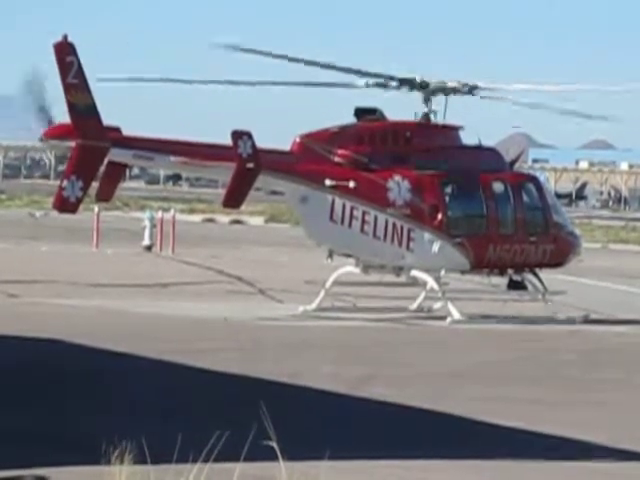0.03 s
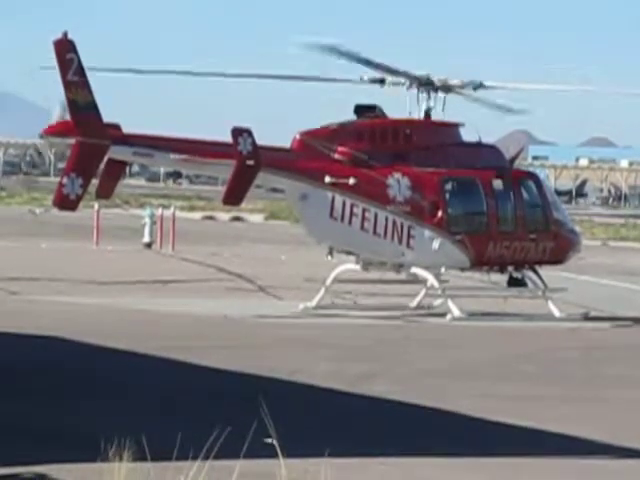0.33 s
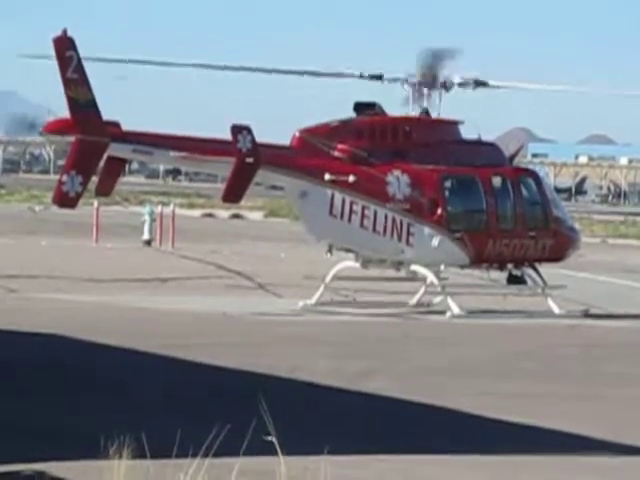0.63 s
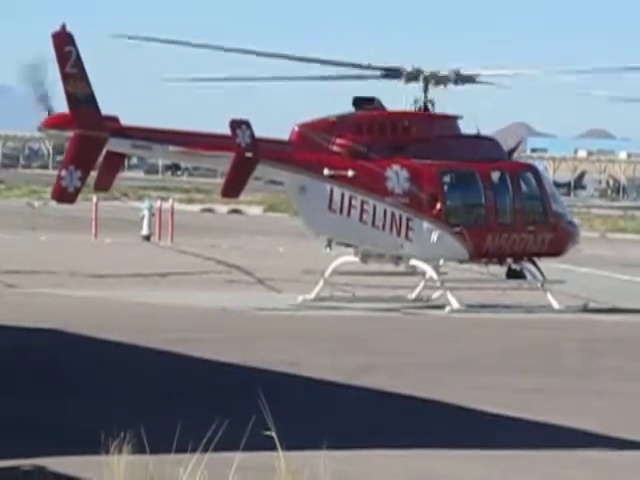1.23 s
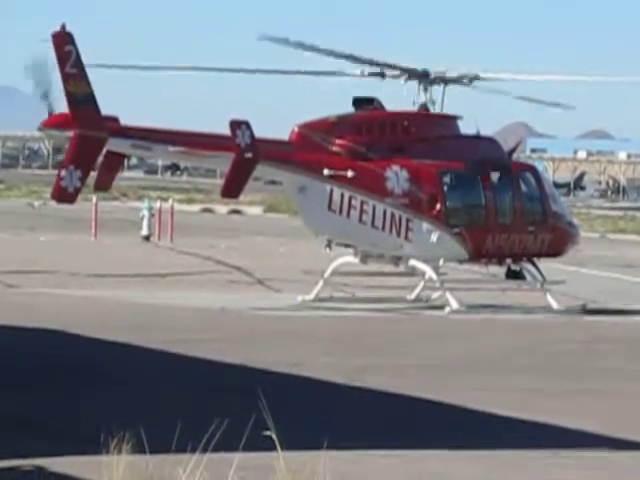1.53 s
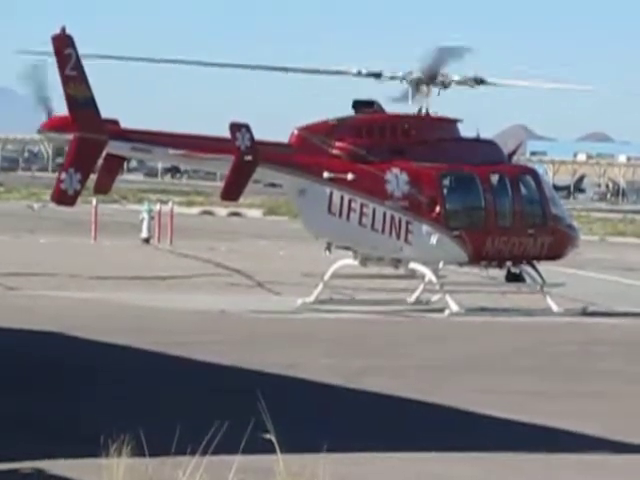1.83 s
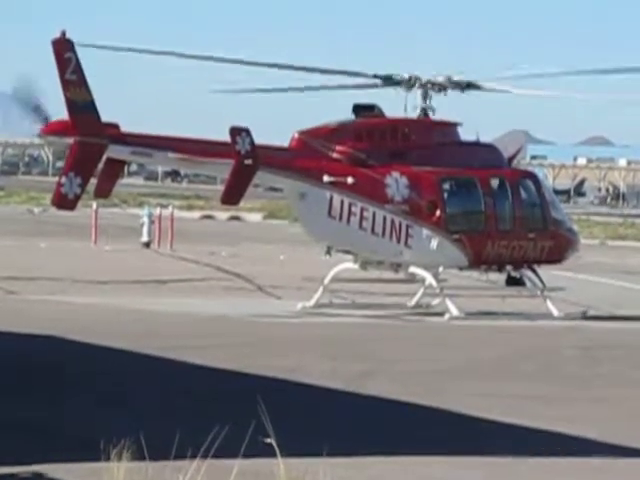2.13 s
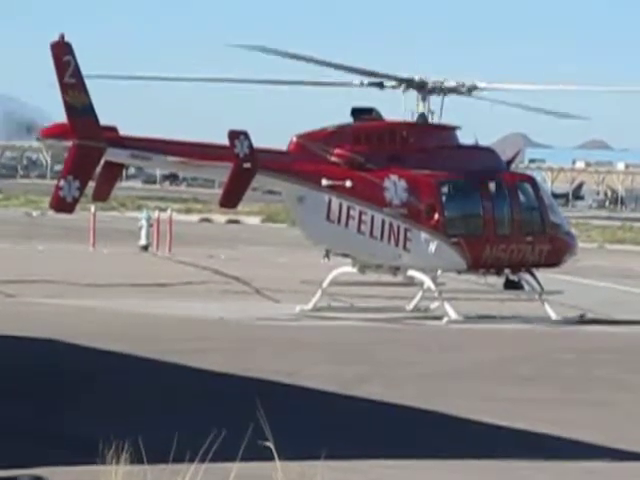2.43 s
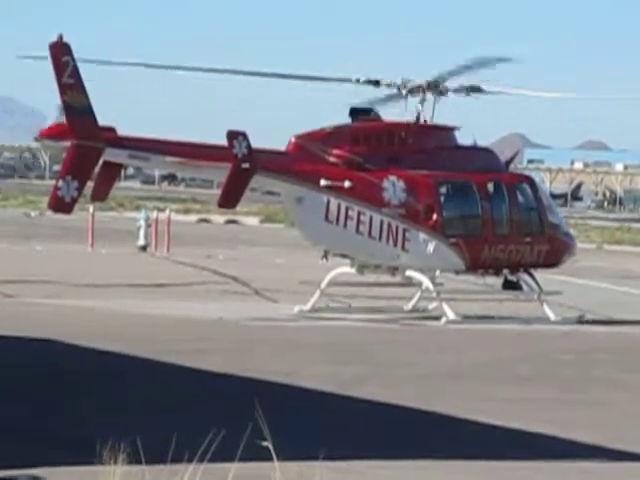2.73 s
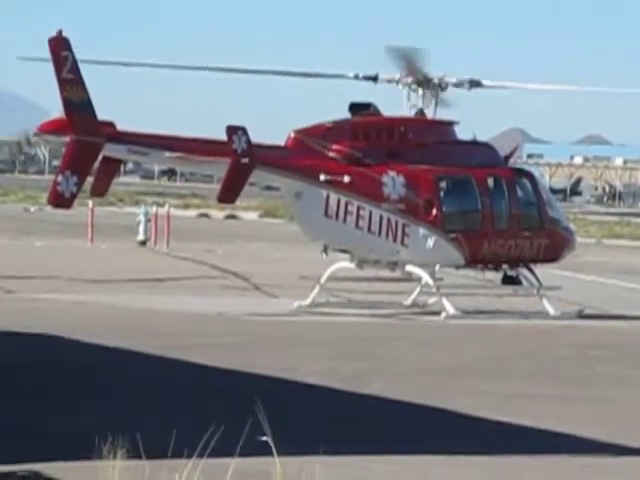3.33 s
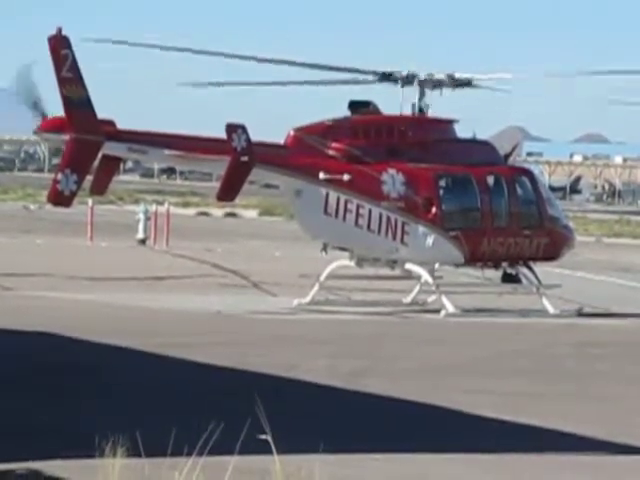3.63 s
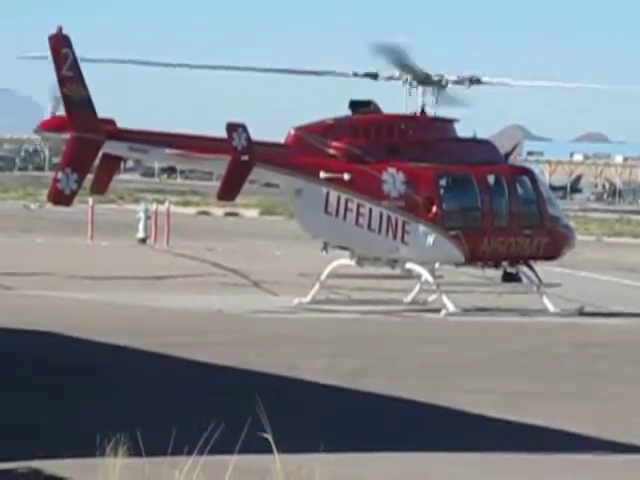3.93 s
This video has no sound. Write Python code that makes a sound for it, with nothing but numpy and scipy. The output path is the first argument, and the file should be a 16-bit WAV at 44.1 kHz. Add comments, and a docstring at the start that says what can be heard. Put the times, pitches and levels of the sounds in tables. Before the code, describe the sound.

A helicopter runs on the ground with a steady turbine roar and swishing blades.

```python
"""An open apron, where a four-bladed turbine helicopter runs, its rotors slowly gaining speed.
Gears and compressor whine faintly over a sinking low hum, and the turbulent exhaust roars.
The tail rotor hums and for a moment chops hard as it cuts the main rotor's wake. Every main blade
swishes past with its own falling whistles. The microphone has a deep treble notch."""
import sys
import numpy as np
from scipy.fft import rfft, irfft, next_fast_len
from scipy.io import wavfile
from scipy.ndimage import map_coordinates

SR = 44100
rng = np.random.default_rng(int(sys.argv[2]) if len(sys.argv) > 2 else 0)


def to_wav(sig):
    """Store sig (one row per channel, or 1-D mono) as 16-bit WAV at the path in sys.argv[1].

    Samples outside -1..1 are clipped; the rate is SR.
    """
    pcm = np.clip(np.atleast_2d(sig), -1, 1) * 32767
    pcm = np.round(pcm).astype(np.int16)
    wavfile.write(sys.argv[1], SR, pcm.T)  # frames by channels


N = 176400
TIME = np.arange(N) / SR

BLADES, PASS_HZ, FIRST_PASS_S = 4, 17.194, .0058  # main rotor; blade passes a second at the start
TAIL_RATIO = 3.048  # tail blade passes per main blade pass
ROTOR_SPEEDUP_PER_S, TURBINE_SPEEDUP_PER_S = .01394, .009  # fractions of the starting speed


def amp(db):
    """Decibels to gain."""
    return 10 ** (np.asarray(db) / 20)


def unit(x):
    """Scale to rms 1."""
    return x / np.sqrt(np.mean(np.abs(x) ** 2) + 1e-20)


def curve(rows, column=1):
    """One column of a time table, one value per sample."""
    rows = np.asarray(rows)
    return np.interp(TIME, rows[:, 0], rows[:, column])


def wobble(rate):
    """A smooth random curve, rate knots a second."""
    return map_coordinates(rng.standard_normal(8192), [TIME * rate], mode="wrap")


def filtered(x, gain):
    """x times a gain that depends on frequency."""
    size = next_fast_len(N + 8192)
    return irfft(rfft(x, size) * gain(np.fft.rfftfreq(size, 1 / SR)), size)[:N]


def noise(colour):
    """Noise of rms 1 with the given EQ curve, dying away beyond its ends."""
    points_hz, db = np.transpose(colour)
    log_hz = np.log(np.r_[points_hz[0] / 2, points_hz, points_hz[-1] * 2])
    db = np.r_[db[0] - 40, db, db[-1] - 40]
    return unit(filtered(rng.standard_normal(N), lambda hz: amp(np.interp(np.log(hz + 1), log_hz, db))))


def sine(cycles):
    """A tone of rms 1 that follows a running count of cycles."""
    return unit(np.sin(2 * np.pi * cycles))


def run_up(speedup):
    """Cycles turned by a shaft that starts at 1 Hz and steadily speeds up."""
    return TIME + speedup * TIME ** 2 / 2


def nearest(phase, count=1):
    """Signed distance to the nearest multiple of count."""
    return (phase + count / 2) % count - count / 2


def bell(offset, width):
    """A smooth swell around offset 0."""
    return np.exp(-(offset / width) ** 2 / 2)


def per_pass(phase, count=1):
    """A normal random value, drawn anew every count passes."""
    return rng.standard_normal(256)[np.round(phase / count).astype(int) % 256]


# The low hum underneath. Each row: time in seconds, pitch in Hz, level in dB.
DRONE_GLIDE = [(0, 85.8, -45), (.5, 77.7, -36.5), (1.2, 71, -45), (1.8, 61, -48), (2.4, 53.2, -41),
               (3, 52, -55), (4, 52, -62)]


def drone():
    """A low hum that sinks and fades behind the rotors."""
    level_db = curve(DRONE_GLIDE, column=2) + wobble(6.8)
    return amp(level_db) * sine(np.cumsum(curve(DRONE_GLIDE)) / SR)


def whines(tones, speedup, flutter=.0021):
    """Thin fluttering tones that rise with their shaft."""
    out = np.zeros(N)
    for hz, first_db, last_db in tones:
        cycles = hz * (run_up(speedup) + flutter * np.cumsum(wobble(120)) / SR)
        out += amp(np.linspace(first_db, last_db, N) + 1.1 * wobble(9.7)) * sine(cycles)
    return out


# Gear tones. Each row: starting pitch in Hz, opening level in dB, closing level in dB.
GEAR_TONES = [(579.3, -50.5, -37.5), (1295, -50, -47)]


def gears():
    """The gears whine, climbing in step with the rotors."""
    return whines(GEAR_TONES, ROTOR_SPEEDUP_PER_S)


# Compressor tones. Each row: starting pitch in Hz, opening and closing level in dB before the fader.
TURBINE_TONES = [(3664, -62, -44), (4650, -75, -56), (10350, -67, -50)]
# Their shared fader. Each row: time in seconds, gain in dB.
TURBINE_FADER = [(0, 9), (2, -4), (2.6, 2), (3.3, -4), (3.75, 5.5), (4, -1)]


def turbine():
    """The compressor's high whines swell together and climb more slowly than the rotors."""
    return amp(curve(TURBINE_FADER)) * whines(TURBINE_TONES, TURBINE_SPEEDUP_PER_S)


# Faders for the roar's three bands. Each row: time in seconds, level in dB.
BASS_FADER = [(0, -26), (.4, -27), (.9, -28), (1.3, -28), (2.0, -28), (2.4, -26.5), (2.7, -26.5),
              (3.0, -28), (3.3, -26), (4, -27.5)]
MIDDLE_FADER = [(0, -28.5), (.25, -27), (.6, -30.5), (1.1, -30), (1.3, -27.5), (1.55, -31), (1.8, -32),
                (2, -28), (2.45, -27.5), (2.64, -27.5), (2.9, -29.5), (3.17, -25.5), (3.35, -29),
                (3.65, -25), (4, -25.5)]
TREBLE_FADER = [(0, -36), (.6, -36.5), (1.1, -37.5), (1.3, -34), (1.6, -35.5), (2.0, -34.5), (2.35, -34),
                (2.7, -34.5), (3.1, -32), (3.5, -31.5), (3.75, -28.5), (4, -31)]
# Their tone. Each row: frequency in Hz, relative level in dB.
BASS_EQ = [(12, -44), (25, -25), (38, -25), (52, -18), (90, -11), (135, -7), (175, 1), (235, -3), (300, -6),
           (355, -13.5), (450, -69)]
MIDDLE_EQ = [(280, -16), (370, -3.5), (440, 1), (575, 3), (700, -10), (850, -6), (1000, -4), (1200, -13.5),
             (1340, -8), (1550, -14.5), (2000, -29)]
TREBLE_EQ = [(1200, -2), (1550, 1), (2050, -1), (2400, 4), (3200, 1), (4300, -6.5), (5400, -6.5),
             (7000, -13.5), (11000, -58)]


def exhaust(passes, throb_db=.77, lag_passes=.48):
    """Turbulent roar in three flickering bands; each main blade makes it throb."""
    bass = amp(curve(BASS_FADER) + 1.17 * wobble(30)) * noise(BASS_EQ)
    middle = amp(curve(MIDDLE_FADER) + 1.03 * wobble(45)) * noise(MIDDLE_EQ)
    treble = amp(curve(TREBLE_FADER) + .91 * wobble(50)) * noise(TREBLE_EQ)
    throb = amp(throb_db * np.cos(2 * np.pi * (passes - lag_passes)))
    return (bass + middle + treble) * throb


# The bite of the rasp. Each row: frequency in Hz, relative level in dB.
RASP_EQ = [(1500, -19), (2300, -8), (2650, -3), (3100, -9), (4200, -26)]


def exhaust_rasp(at_s=3.702, width_s=.022, level_db=-28.5):
    """The roar rasps briefly in a narrow treble band."""
    return amp(level_db + 1.6 * wobble(150)) * bell(TIME - at_s, width_s) * noise(RASP_EQ)


# Tail harmonics. Each row: multiple of the tail blade rate, opening level in dB, closing level in dB.
TAIL_HARMONICS = [(1, -49, -45.5), (2, -45.5, -41), (3, -43, -68), (4, -36.5, -36.5)]


def tail_hum(tail_passes):
    """The tail blades hum at their passing rate and its harmonics."""
    out = np.zeros(N)
    for harmonic, first_db, last_db in TAIL_HARMONICS:
        level_db = np.linspace(first_db, last_db, N) + 1.45 * wobble(5.1)
        out += amp(level_db) * sine(harmonic * tail_passes + rng.random())
    return out


# Faders for the chop's noisy edge and the thump under it. Each row: time in seconds, peak level in dB.
CHOP_FADER = [(0, -30), (1.68, -41), (1.755, -25), (1.83, -34), (2.5, -39), (2.6, -25), (2.66, -21.5),
              (2.71, -25), (2.9, -24), (3.13, -27.5), (3.27, -30), (4, -36)]
THUMP_FADER = [(0, -45), (2.5, -46), (2.64, -16.5), (2.78, -29), (3.0, -24), (3.11, -12), (3.19, -16),
               (3.3, -28), (4, -26)]
# The tone of that edge. Each row: frequency in Hz, relative level in dB.
CHOP_EQ = [(150, 14), (500, 1.5), (900, 15.5), (1800, 8.5), (2900, 11.5), (4500, -3.5), (8000, -2),
           (14000, -40)]


def tail_chop(tail_passes, lead_passes=.11, burst_width=.074, thump_width=.029):
    """Each tail blade cuts the main rotor's wake with a burst of noise and a pressure pulse."""
    phase = tail_passes + lead_passes
    offset = nearest(phase)  # in tail blade passes, like both widths
    burst_db = curve(CHOP_FADER) + 1.6 * per_pass(tail_passes)
    burst = bell(offset, burst_width) * amp(burst_db) * noise(CHOP_EQ)
    pulse = (1 - (offset / thump_width) ** 2) * bell(offset, thump_width)  # a peak between two troughs
    return burst + pulse * amp(curve(THUMP_FADER) + per_pass(phase))


# The sizzle's fader. Each row: time in seconds, level in dB.
SIZZLE_FADER = [(0, -47), (1.2, -46.5), (2.0, -44), (2.6, -49), (4, -44)]
# Its bright top. Each row: frequency in Hz, relative level in dB.
SIZZLE_EQ = [(8000, -3), (10500, 2), (12500, -1.5), (14000, -7.5), (15700, -15)]


def sizzle(passes, lead_passes=.075, width_passes=.13, grain_db=5):
    """A crackly top edge that leads each main blade's swish."""
    level_db = curve(SIZZLE_FADER) + grain_db * np.minimum(wobble(260), 2)
    return bell(nearest(passes + lead_passes), width_passes) * amp(level_db) * noise(SIZZLE_EQ)


# The eddies' fader. Each row: time in seconds, peak level in dB of a chirp at the centre pitch.
EDDY_FADER = [(0, -31), (1.2, -22.5), (1.9, -19.5), (2.5, -24.5), (2.8, -29), (4, -30)]


def eddies(passes, count=420, centre_hz=8544, fall_per_s=4.7, width_s=.001, spread_passes=.29):
    """Stray eddies give tiny falling chirps, bunched around the moments when a blade passes."""
    lag, pitch, size, start_phase = rng.standard_normal((count, 4)).T
    at_pass = np.floor(np.linspace(0, passes[-1], count)) + spread_passes * lag
    at_sample = np.interp(at_pass, passes, np.arange(N)).astype(int)
    hz = centre_hz * np.exp(.191 * pitch)
    db = curve(EDDY_FADER)[at_sample] + 2 * size
    db -= 6 * np.abs(hz - centre_hz) / 1e3  # quieter with every kHz off centre
    window = np.arange(-400, 400)
    t = window / SR
    cycles = hz[:, None] * (t - fall_per_s * t * t / 2) + start_phase[:, None]
    chirps = amp(db)[:, None] * bell(t, width_s) * np.sin(2 * np.pi * cycles)
    return np.bincount(((at_sample[:, None] + window) % N).ravel(), chirps.ravel(), N)


# Each blade's own whistles. Each row: blade number, lag in passes, pitch in Hz,
# level in dB before the fader, swell width in passes, fall of log pitch per pass.
WHISTLE_VOICES = [(0, .13, 8210, -31, .11, 1.3), (0, .05, 7650, -30.5, 0.2, 0.15),
                  (0, -0.099, 10180, -44.5, 0.13, .5), (1, .07, 7480, -30.5, 0.23, .2),
                  (1, -.13, 11340, -53.5, 0.18, 0.14), (2, .13, 7800, -29, 0.082, .5),
                  (3, .08, 7655, -29.5, 0.22, 0.28)]
# Their shared fader. Each row: time in seconds, gain in dB.
WHISTLE_FADER = [(0, 3.5), (1, 3.5), (2, 3.5), (2.5, 4), (2.8, -0.5), (3.4, 0), (4, -10)]


def blade_whistles(passes, band_hz=750, jitter_passes=.04, grain_db=2.5, release_ratio=.48):
    """Each blade sheds rough, narrow bands of noise that swell, fall in pitch and break off."""
    out = np.zeros(N)
    for blade, lag, hz, db, width, fall in WHISTLE_VOICES:
        phase = passes - blade - lag
        offset = nearest(phase, BLADES) + jitter_passes * per_pass(phase, BLADES)
        pitch_hz = hz * np.exp(-fall * offset + .02 * per_pass(phase, BLADES))
        band = unit(wobble(2 * band_hz) + 1j * wobble(2 * band_hz))
        tone = unit(np.real(band * np.exp(2j * np.pi * np.cumsum(pitch_hz) / SR)))
        swell = bell(offset, width * np.where(offset < 0, 1, release_ratio))
        out += tone * swell * amp(db + grain_db * wobble(250))
    return out * amp(curve(WHISTLE_FADER))


# Faders for the main blades' hiss, swish and chuff. Each row: time in seconds, level in dB.
HISS_FADER = [(0, -35), (1, -35.5), (2, -34), (2.8, -35), (4, -31.5)]
SWISH_FADER = [(0, -48), (.5, -39), (1.2, -42), (2, -45.5), (2.5, -41), (2.8, -48), (3.4, -50), (4, -44)]
CHUFF_FADER = [(0, -41), (.6, -34), (1.05, -33), (1.8, -33), (2.5, -37), (4, -32)]
# Their tone; slaps share the chuff's. Each row: frequency in Hz, relative level in dB.
HISS_EQ = [(5000, -6), (6700, -6.5), (7600, 5), (8500, 5), (9700, -0.5), (10600, -7.5), (11200, -13),
           (13000, -15), (15700, -30)]
SWISH_EQ = [(5000, 8), (6700, -27), (7600, 6), (8800, -10.5), (9900, 10.5), (11200, -32), (13000, -36),
            (15700, -34)]
CHUFF_EQ = [(800, -15), (2800, 0), (5000, -10), (9000, -4), (15000, -37)]
# Sharper slaps of single blades. Each row: time of the peak in seconds, level in dB.
SLAP_HITS = [(0.135, -28.5), (0.311, -29), (0.966, -41), (1.024, -40), (1.08, -31), (1.369, -36),
             (2.44, -38), (2.495, -40)]


def main_rotor(passes, swish_lag_passes=.057, chuff_lag_passes=.54, slap_width_s=.0045):
    """Blades sweep the air: grainy hiss, a swish for each, a soft chuff in between and the odd slap."""
    swish_db = curve(SWISH_FADER) + per_pass(passes) + 6 * wobble(220)  # the fast wobble adds grain
    swish = bell(nearest(passes - swish_lag_passes), width=.26) * amp(swish_db)
    chuff_phase = passes - chuff_lag_passes
    chuff = bell(nearest(chuff_phase), width=.13) * amp(curve(CHUFF_FADER) + per_pass(chuff_phase))
    slaps = sum(amp(db) * bell(TIME - at_s, slap_width_s) for at_s, db in SLAP_HITS)
    hiss = amp(curve(HISS_FADER) + 2.03 * wobble(130))
    return swish * noise(SWISH_EQ) + (chuff + slaps) * noise(CHUFF_EQ) + hiss * noise(HISS_EQ)


def scene():
    """The helicopter in mono; both rotors and the gears share one drive."""
    passes = PASS_HZ * (run_up(ROTOR_SPEEDUP_PER_S) - FIRST_PASS_S)  # running count of main blades
    main = main_rotor(passes) + blade_whistles(passes) + eddies(passes) + sizzle(passes)
    tail = tail_hum(TAIL_RATIO * passes) + tail_chop(TAIL_RATIO * passes)
    roar = exhaust(passes) + exhaust_rasp()
    return (main + tail + roar + turbine() + gears() + drone())[None]


NOTCH_HZ, NOTCH_WIDTH_HZ, TOP_HZ = 6310, 1420, 15750


def record(dry):
    """The microphone scoops a deep notch out of the treble, and the very top is cut off."""
    notch = lambda hz: np.abs(hz - NOTCH_HZ) / np.hypot(hz - NOTCH_HZ, NOTCH_WIDTH_HZ)
    return filtered(dry[0], lambda hz: notch(hz) * (hz < TOP_HZ))[None]


dry = scene()
out = record(dry)
to_wav(out)
```